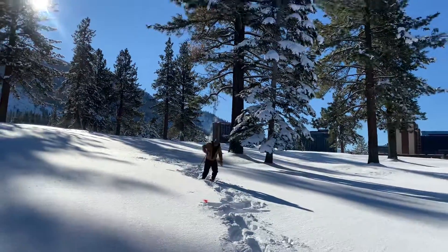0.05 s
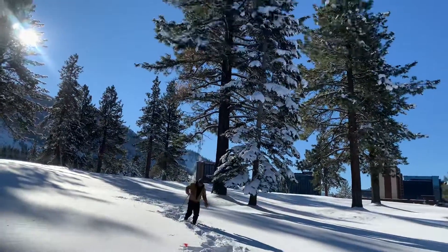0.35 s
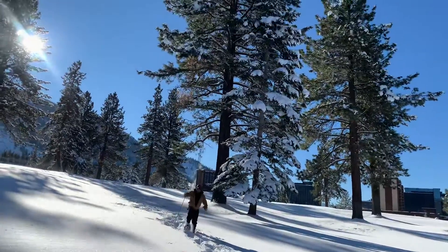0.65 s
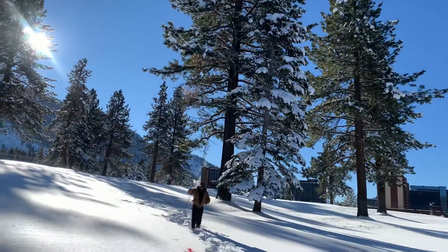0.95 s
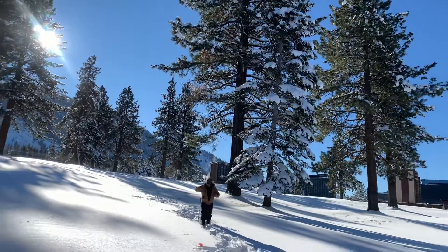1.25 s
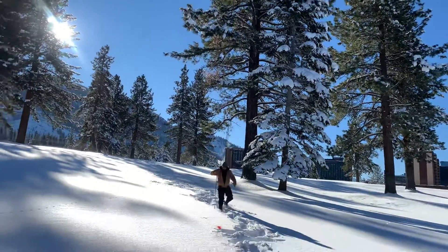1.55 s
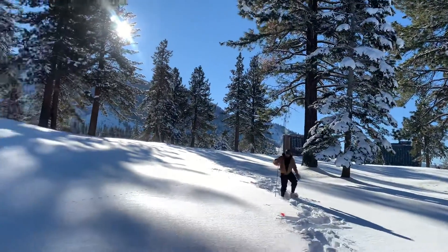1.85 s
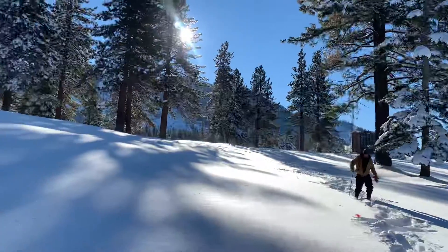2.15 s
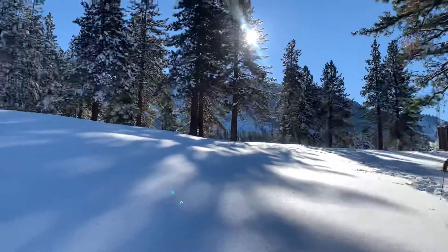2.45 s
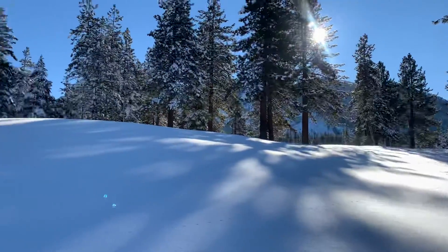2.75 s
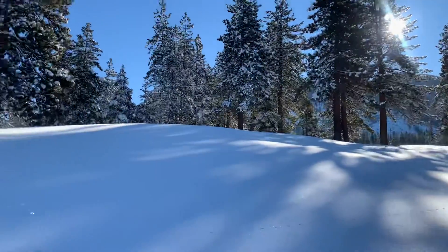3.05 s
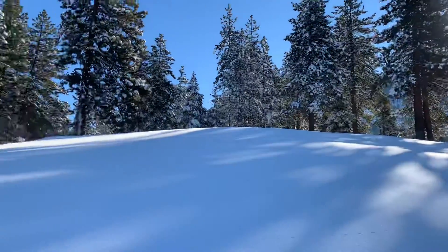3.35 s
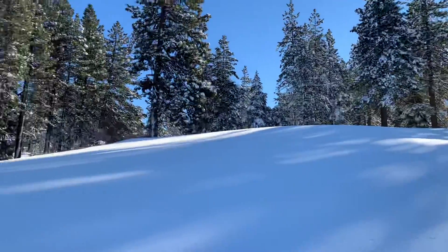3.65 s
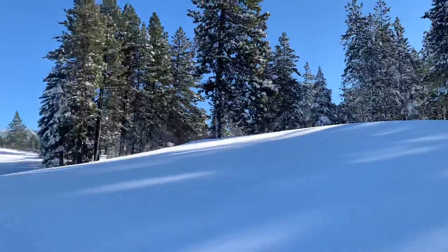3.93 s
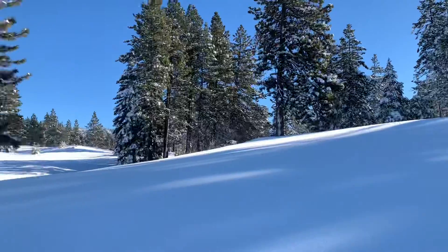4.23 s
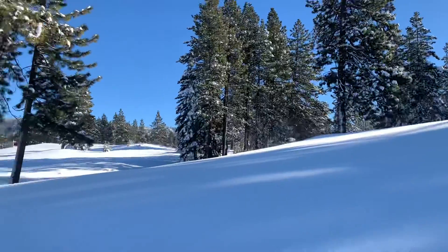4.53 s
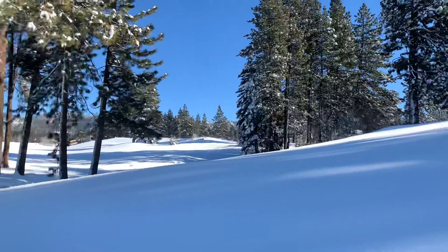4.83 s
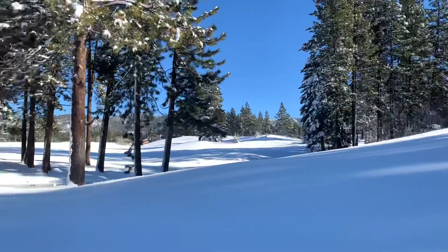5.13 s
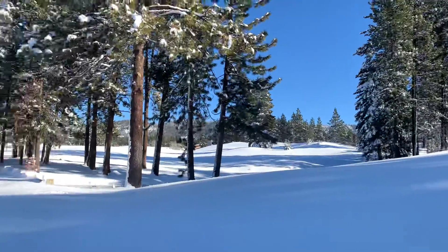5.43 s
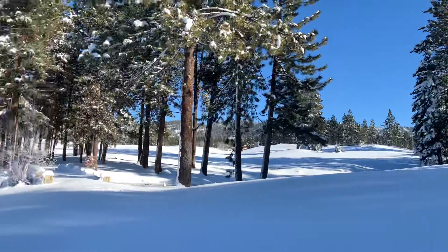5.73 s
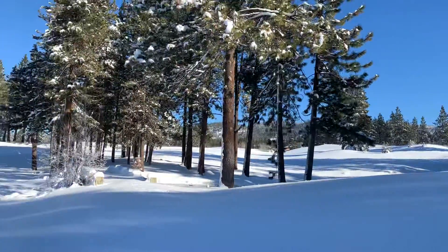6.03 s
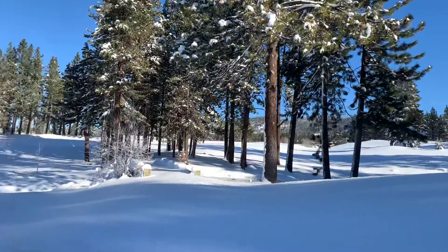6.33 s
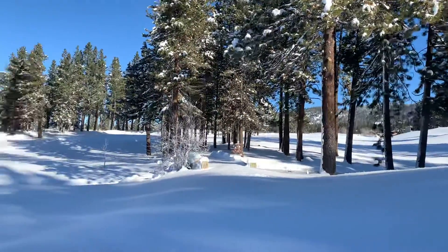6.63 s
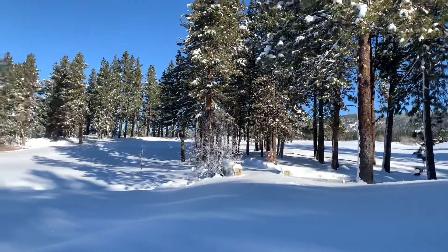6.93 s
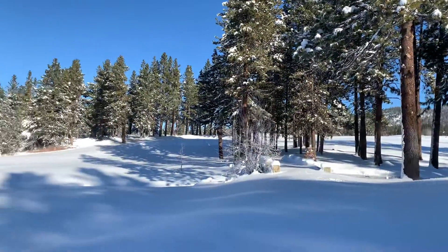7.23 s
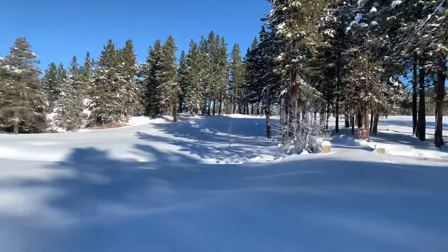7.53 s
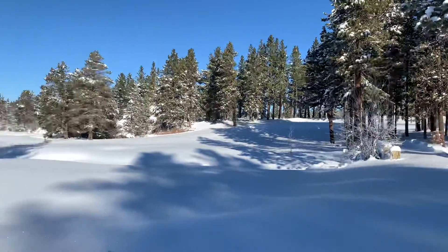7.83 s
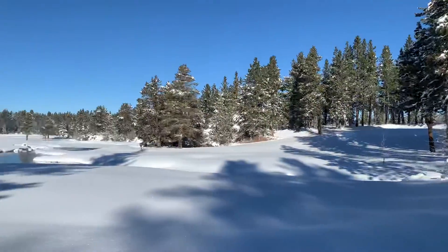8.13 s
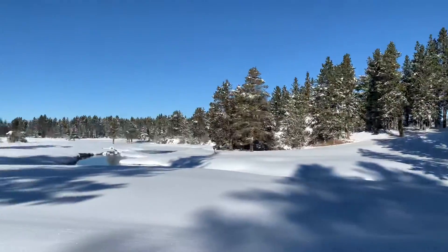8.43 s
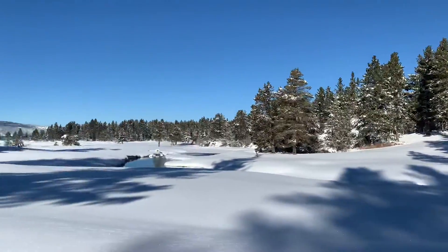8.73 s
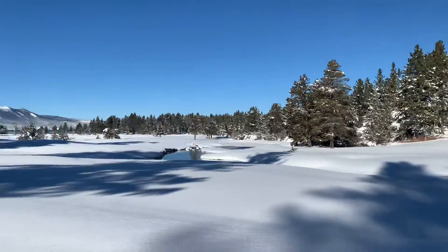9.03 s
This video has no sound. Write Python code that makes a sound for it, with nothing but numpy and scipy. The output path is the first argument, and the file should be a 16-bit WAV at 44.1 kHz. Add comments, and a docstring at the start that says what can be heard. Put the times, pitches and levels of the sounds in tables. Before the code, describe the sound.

Low, uneven gusts buffet the microphone over faint wind in distant pines, while a jacket rustles with small clicks.

```python
"""A snowfield with pines in a light wind, heard from a phone held by someone turning slowly on the spot.
Right on the microphone, gusts boom and flutter, eddies thump, and a finger knocks the case once.
Far off, the air roars softly in the trees. Within arm's reach a winter jacket swishes as cloth slides
over cloth, ticks as folds snap over, and gives one tiny squeak. A faint hiss lies under it all."""
import sys
import numpy as np
from scipy import signal
from scipy.fft import rfft, irfft, next_fast_len
from scipy.io import wavfile
from scipy.ndimage import uniform_filter1d, map_coordinates

SR = 44100
rng = np.random.default_rng(int(sys.argv[2]) if len(sys.argv) > 2 else 0)


def log_audio(samples):
    """Write samples as a 16-bit WAV file to the path given in sys.argv[1]."""
    # one column per channel
    frames = np.atleast_2d(samples).T
    # limit to full scale, then quantise
    limited = np.clip(frames, -1, 1)
    pcm = np.round(limited * 32767).astype(np.int16)
    wavfile.write(sys.argv[1], SR, pcm)


N = 404838
T = np.arange(N) / SR

# colour of lightly brushed cloth, close up: f/Hz, level/dB
LIGHT_CLOTH = [(1200, -19.5), (2200, -11), (2900, 1), (3800, 1), (4650, -6), (5300, -13), (6100, -14),
               (6800, -37.5), (10000, -50.5)]


def undb(db):
    """Decibels to gain."""
    return np.exp(np.asarray(db) * (np.log(10) / 20))


def unit(x):
    """Scale to rms 1."""
    return x / np.sqrt(np.mean(x ** 2))


def curves(table, at=T):
    """The columns of a table, joined by straight lines in time."""
    s, *columns = np.transpose(table)
    return [np.interp(at, s, c) for c in columns]


def colour(x, points):
    """Filter by an outline (f/Hz, level/dB) on a log-frequency axis."""
    hz, db = np.transpose(points)
    size = next_fast_len(N, True)
    bins_hz = np.maximum(np.fft.rfftfreq(size, 1 / SR), 1)
    gain = undb(np.interp(np.log(bins_hz), np.log(hz), db))
    return irfft(rfft(x, size) * gain, size)[:N]


def noise(points):
    """Coloured noise of rms 1 that dies away beyond the ends of its outline."""
    below = (points[0][0] / 2, points[0][1] - 20)
    above = (points[-1][0] * 2, points[-1][1] - 40)
    return unit(colour(rng.standard_normal(N), [below, *points, above]))


def walk(rate_hz):
    """A smooth random wander of rms 1."""
    step = int(SR / rate_hz)
    held = np.repeat(rng.standard_normal(N // step + 1), step)
    return unit(uniform_filter1d(held, step)[:N])


def steady(x, span_s):
    """Even out swells slower than span_s and scale to rms 1."""
    power = uniform_filter1d(np.abs(signal.hilbert(x)) ** 2, int(span_s * SR))
    return unit(x / np.sqrt(power + 1e-12))


def bell(s, length_s):
    """A smooth rise and fall around time s, 1 at the crest."""
    return np.exp(-(2 * (T - s) / length_s) ** 2)


def stereo(mid, side):
    """Left and right from mid and side."""
    return np.array([mid + side, mid - side])


def pan(x, db):
    """Place a sound by its left minus right level."""
    return x * undb(np.array([[1], [-1]]) * db / 2)


def ports(x, lead_rad):
    """A near source reaches the microphone's left port earlier by this phase."""
    return stereo(x, -np.tan(lead_rad / 2) * signal.hilbert(x).imag)


def add(out, s, sound):
    """Mix a sound in at time s."""
    start = int(s * SR)
    part = sound[..., :N - start]
    out[..., start:start + part.shape[-1]] += part


def wind_levels(breeze_boom_db=-39, breeze_flutter_db=-51.5, boom_wander_db=3.2, flutter_wander_db=2.6):
    """Boom, flutter and bare gust in dB: gusts add their power to the breeze, lulls take it away."""
    # gusts and puffs at the microphone: crest t/s, length/s, boom/dB, flutter/dB
    gusts = [(0.111, .05, -35, -48), (0.253, 0.08, -29.5, -39), (0.367, 0.098, -25.5, -41.5),
             (0.533, 0.11, -24.5, -39.5), (0.637, .11, -25.5, -40.5), (0.785, 0.18, -26.5, -45.5),
             (0.969, .06, -34.5, -42), (1.287, .12, -35.5, -45), (1.397, 0.088, -39, -42),
             (1.536, 0.15, -25, -37), (1.661, 0.053, -36.5, -55), (1.802, 0.09, -39, -39),
             (2.151, .17, -38, -54.5), (2.334, 0.14, -30.5, -40), (2.479, .06, -36, -47),
             (2.64, 0.045, -31.5, -49), (2.901, .14, -37, -56), (3.227, 0.065, -31, -44),
             (3.335, 0.064, -33, -48), (3.481, 0.16, -29.5, -47.5), (3.728, .11, -35, -58),
             (4.005, .08, -31.5, -50), (4.576, 0.15, -32.5, -47), (4.747, .07, -34, -59),
             (4.934, 0.094, -34.5, -41), (5.14, 0.092, -33, -57), (5.249, .08, -36.5, -61.5),
             (5.384, 0.099, -34.5, -56), (5.54, 0.047, -33, -40), (5.685, 0.055, -34, -58),
             (5.858, 0.082, -32.5, -56), (5.979, 0.1, -34.5, -53), (6.13, 0.1, -29.5, -47),
             (6.379, .08, -31.5, -34), (6.478, 0.23, -23.5, -39.5), (6.718, .15, -33.5, -48.5),
             (6.971, .1, -32.5, -41), (7.092, 0.2, -30, -38.5), (7.29, 0.2, -27, -38.5),
             (7.395, .08, -33, -39.5), (7.565, 0.15, -23, -40), (7.676, 0.16, -22, -35),
             (7.991, 0.11, -30.5, -40), (8.14, .1, -31, -37), (8.281, 0.15, -29, -39),
             (8.503, 0.074, -33, -52), (8.958, .1, -32, -44), (9.107, 0.17, -25.5, -37)]
    # moments when the wind drops away: t/s, length/s, level change/dB
    lulls = [(1.018, 0.028, -11), (2.006, 0.087, -10), (2.731, 0.15, -6), (3.14, 0.05, -8),
             (3.818, 0.04, -11.5), (4.271, 0.12, -11), (5.03, 0.29, -5.5), (6.267, 0.066, -9.5),
             (6.84, 0.06, -3), (8.41, 0.032, 1), (8.604, 0.041, -8), (8.816, 0.07, -4)]
    boom_power, flutter_power = undb(breeze_boom_db) ** 2, undb(breeze_flutter_db) ** 2
    for s, length_s, boom_db, flutter_db in gusts:
        swell = bell(s, length_s)
        boom_power += (undb(boom_db) * swell) ** 2
        flutter_power += (undb(flutter_db) * swell) ** 2
    gust_db = 10 * np.log10(boom_power)
    lull_db = sum(db * bell(s, length_s) for s, length_s, db in lulls)
    # the weak breeze is fitful, a strong gust blows more evenly
    waver = walk(16) * np.sqrt(undb(breeze_boom_db - gust_db))
    boom_db = gust_db + lull_db + boom_wander_db * waver
    flutter_db = 10 * np.log10(flutter_power) + lull_db / 2 + flutter_wander_db * waver
    return boom_db, flutter_db, gust_db


def wind_boom(level_db, gust_db, sag_per_db=0.0173):
    """Turbulence on the microphone drives a narrow boom whose pitch sags as the gust grows."""
    # resonances of the boom: f/Hz, width/Hz, level/dB
    modes = [(35.82, 3.5, -16.5), (50.98, 3.57, -5)]
    # the microphone sheds the deepest bass: f/Hz, gain/dB
    low_cut = [(22, -16), (34, -3), (46, 0)]
    push = noise([(26, -32), (36, -5.5), (47, -0.5), (56, -0.5), (70, -10.5), (130, -28)])
    boom = sum(undb(db) * signal.lfilter(*signal.iirpeak(hz, hz / width_hz, SR), push)
               for hz, width_hz, db in modes)
    speed = 1 - sag_per_db * (gust_db - gust_db.mean())
    boom = map_coordinates(boom, [np.cumsum(speed)], order=1, mode="mirror")
    boom = steady(boom, span_s=0.075) * undb(level_db)
    return pan(colour(boom, low_cut), db=-1.24)


def wind_flutter(level_db, side_db=-8):
    """Small eddies hit each port separately: a loose flutter, a little stronger on the right."""
    # colour of the flutter: f/Hz, level/dB
    spectrum = [(45, -30.5), (65, -6.5), (80, 3), (100, -1.5), (130, -11), (170, -19.5), (300, -43),
                (700, -61.5)]
    mid = steady(noise(spectrum), span_s=0.09)
    side = undb(side_db) * noise(spectrum)
    return pan(stereo(mid, side) * undb(level_db), db=-1.5)


def ground_ripple(x, reach_hz=2300, main_db=6, main_width_hz=90, patchy_db=2.5):
    """Far sound interferes with its ground echo: evenly spaced crests, shimmering in the moving air."""
    # the crests as the phone turns: t/s, strongest crest f/Hz, spacing/Hz, depth/dB
    comb = [(0, 1300, 802, 1), (1.6, 1230, 736, 1), (2.2, 1544, 524, .5), (3.3, 1347, 565, 1),
            (4.3, 1366, 645, 2), (5.1, 1420, 677, 1.5), (5.85, 1583, 543, 0.7), (6.6, 1630, 581, -0.3),
            (7.85, 1650, 654, 0.36), (9.18, 1636, 677, 1.5)]
    hz, s, frames = signal.stft(x, SR, nperseg=1024)
    crest_hz, spacing_hz, depth_db = curves(comb, s)
    hz = hz[:, None]
    crests = np.cos(2 * np.pi * (hz - crest_hz) / spacing_hz) / (1 + (hz / reach_hz) ** 8)
    main_crest = np.exp(-((hz - crest_hz) / main_width_hz) ** 2) * depth_db / depth_db.max()
    shimmer = uniform_filter1d(rng.standard_normal(frames.shape), size=3, axis=0)
    shimmer = unit(uniform_filter1d(shimmer, size=7, axis=1))
    lift_db = depth_db * crests + main_db * main_crest + patchy_db * shimmer
    return signal.istft(frames * undb(lift_db), SR)[1][:N]


def distant_air(direct=.9, wander_db=.6):
    """Far wind in the pines; it comes mostly from one side, so the ports hear it out of step."""
    # strength of the far wind: t/s, low roar/dB, body/dB, sough of the pines/dB
    levels = [(0.0, -58, -66.5, -66.5), (0.89, -58, -68.5, -69), (2.25, -58.5, -67, -67.5),
              (2.71, -59, -71, -67.5), (4.01, -59, -65, -68.5), (4.78, -57.5, -64.5, -64.5),
              (5.11, -61, -62.5, -66), (6.72, -60, -65, -63), (7.13, -56, -70.5, -62),
              (7.87, -59, -68, -61), (8.16, -58.5, -67, -65.5), (8.54, -56.5, -68.5, -68.5),
              (9.18, -60, -74, -66)]
    # colours of those three layers: f/Hz, level/dB
    roar = [(60, -1.5), (150, -2), (250, 3), (450, 1.5), (560, -1.5), (750, -17.5), (1200, -42)]
    body = [(350, -15.5), (600, 2.5), (820, 3.5), (1050, -1.5), (1300, -13), (2000, -29)]
    sough = [(800, -16), (1150, -0.5), (1450, -1), (1850, -4.5), (2200, -14), (2550, -21.5), (3000, -20),
             (4500, -33.5), (7000, -39.5)]
    # stereo width: f/Hz, side minus mid/dB
    width = [(100, -6.5), (250, -3.5), (420, -0.5), (670, 4.5), (1100, 2.5), (1500, -1), (2000, -8),
             (3000, -1), (5000, 2)]
    # the roar leans to the left: f/Hz, left minus right/dB
    balance = [(130, -0.5), (260, 5.5), (420, 1.5), (800, 0)]
    gains = [undb(db + wander_db * walk(6)) for db in curves(levels)]
    layers = list(zip((roar, body, sough), gains))
    front = sum(noise(spectrum) * gain for spectrum, gain in layers)
    diffuse = sum(noise(spectrum) * gain for spectrum, gain in layers)
    # the difference between two close ports is a quarter cycle behind their sum
    behind = signal.hilbert(front).imag
    side = colour(direct * behind + np.sqrt(1 - direct ** 2) * diffuse, width)
    left, right = stereo(ground_ripple(front), side)
    return np.array([colour(left, [(hz, db / 2) for hz, db in balance]),
                     colour(right, [(hz, -db / 2) for hz, db in balance])])


def faint_hiss(gust_db, floor_db=-86, swell_db=-70.5, full_at_db=-27.5):
    """A steady hiss in each channel, and a second one that swells with the strongest gusts."""
    # colours of the two hisses: f/Hz, level/dB
    floor_colour = [(1500, -10.5), (2900, -8), (4500, -20), (6500, -3), (9000, -14), (15000, -5.5)]
    swell_colour = [(1500, -14), (3000, -1.5), (4500, -13.5), (7000, -10.5), (11000, -13), (15000, -18.5)]
    floor = np.array([noise(floor_colour), noise(floor_colour)])
    swell = np.array([noise(swell_colour), noise(swell_colour)])
    onset_db = 6 * np.minimum(gust_db - full_at_db, 0)
    return floor * undb(floor_db) + swell * undb(swell_db + onset_db)


def rub_levels(rise_share=0.54, range_db=20, roundness=1.4, rest_db=-100):
    """Gains of light rubbing, pressed rubbing and sheen: each stroke climbs to a peak and falls away."""
    # sleeve strokes: peak t/s, length/s, level/dB, pressed against light cloth/dB, sheen/dB
    strokes = [(0.173, 0.81, -89.5, 9.5, -0.5), (0.994, 0.96, -91.5, 4.5, -8.5),
               (1.883, 1.3, -83.5, 8.5, -11), (2.262, 0.22, -82.5, -3, -6), (2.5, .3, -90.5, 2, -6),
               (3.0, 1.5, -90.5, -3, -5), (4.557, 0.41, -64, -3.5, 0), (5.082, .5, -78.5, -15, 1),
               (5.576, 0.32, -70, -12.5, -3.5), (5.947, 1, -85, -5, -7), (6.259, 0.25, -68, -11, -15.5),
               (6.326, .1, -66, -15, -16), (6.47, 0.24, -76.5, 0, -6), (7.025, 0.41, -62, -2, 0),
               (7.105, 0.17, -50.5, -3.5, -3.5), (7.154, 0.17, -56.5, 1.5, -0.5),
               (7.292, .3, -68.5, 5.5, 8), (7.441, 0.25, -70.5, 4, 4), (7.62, 0.35, -72, 2.5, 4),
               (7.886, 0.34, -77, 5.5, -1.5), (8.144, 0.19, -74, 2.5, -4), (8.441, 1.2, -81, 5, -3),
               (8.767, 0.32, -69, 2, 1.5), (9.176, 0.74, -73.5, 4, -8)]
    light = pressed = sheen = undb(rest_db) ** 2  # the cloth never lies quite still
    for s, length_s, db, pressed_db, sheen_db in strokes:
        from_peak = np.maximum((s - T) / rise_share, (T - s) / (1 - rise_share)) / length_s
        power = undb(db - range_db * from_peak ** roundness) ** 2
        light = light + power
        pressed = pressed + power * undb(pressed_db) ** 2
        sheen = sheen + power * undb(sheen_db) ** 2
    return np.sqrt(light), np.sqrt(pressed), np.sqrt(sheen / light)


def jacket_swish(grain_db=1.8, catch_db=1.2, creases_per_s=30, scatter_db=-9, echo_s=.0061, echo_db=-8):
    """Cloth slides over cloth at arm's length: countless tiny slips, crinkles and a ground echo."""
    # colours of hard-pressed cloth and of rustle scattered off the body: f/Hz, level/dB
    pressed_cloth = [(700, -23), (1300, -6), (1800, 2.5), (2250, -2), (2750, 1), (3400, -10.5), (4500, -20)]
    scatter = [(2000, -11), (3000, -4.5), (4400, 1.5), (5600, 0.5), (6500, -11.5), (9000, -29.5)]
    # treble cut that takes the sheen off the rustle: f/Hz, gain/dB
    sheen_cut = [(4600, 0), (5400, -22.5)]
    # bearing of the rubbing cloth from the microphone: t/s, left port's lead/rad
    bearing = [(2, 0.58), (4.55, 1.07), (6.3, 1.04), (7.1, 0.32), (7.6, 1.3), (9.18, 0.97)]
    light, pressed, sheen = rub_levels()
    slips = unit(undb(grain_db * walk(900) + catch_db * walk(70)))
    swish = (noise(LIGHT_CLOTH) * light + noise(pressed_cloth) * pressed) * slips
    # creases give way at random, harder when the cloth moves fast
    creases = (rng.random(N) < creases_per_s / SR) * rng.random(N)
    crinkles = colour(creases, LIGHT_CLOTH) * undb(-6) * light ** 0.98
    scattered = stereo(0, noise(scatter) * light * slips * undb(scatter_db))
    cloth = ports(swish + crinkles, *curves(bearing)) + scattered
    matte = np.array([colour(x, sheen_cut) for x in cloth])
    cloth = matte + sheen * (cloth - matte)
    return cloth + undb(echo_db) * np.roll(cloth, int(echo_s * SR), axis=1)


def case_knock(at_s=.158, rise_cycles=2.16, left_lag_rad=2.54):
    """A finger knocks the phone's case; each mode swells for about two cycles, so the lows come late."""
    # ringing of the case: f/Hz, level/dB, t60/s
    modes = [(246, -36, .035), (466, -19.5, 0.021), (810, -33, 0.012), (1250, -37, .01),
             (2130, -35.5, 0.011), (6600, -56, .0025)]
    out, t = np.zeros((2, N)), np.arange(SR // 10) / SR
    port_phase = np.array([[-1], [1]]) * left_lag_rad / 2
    for hz, db, t60 in modes:
        peak_s = rise_cycles / hz
        rise = np.minimum(t / peak_s, 1) ** 3
        fade = undb(-60 * np.maximum(t - peak_s, 0) / t60)
        add(out, at_s, undb(db) * rise * fade * np.sin(2 * np.pi * hz * t + port_phase))
    return out


def eddy_thumps(sweep_cycles=1.26, rest_hz=22.5, attack=.59, release=.66, pan_db=-11, settle_s=.014):
    """Each eddy is a quick downward sweep: the highs strike the right port, the bass trails on both."""
    # eddies on the microphone: t/s, peak/dB, starting pitch above rest/Hz, time to the peak/s
    eddies = [(0.164, -19, 214, 0.014), (0.873, -28, 330, 0.015), (1.141, -29.5, 202, 0.015),
              (1.459, -11.5, 280.7, 0.02), (2.045, -29, 194, 0.017), (2.987, -26.5, 275, 0.026),
              (3.857, -30.5, 178, 0.018), (3.981, -33.5, 169, 0.017), (4.407, -31, 212, 0.017),
              (4.848, -37, 300.4, 0.0081), (5.517, -36.5, 454, 0.0055), (5.905, -26.5, 238, 0.015),
              (6.065, -28, 210, 0.014), (7.23, -16.5, 270, 0.02), (7.553, -33.5, 328, 0.015),
              (9.061, -22, 247, 0.025)]
    out, t = np.zeros((2, N)), np.arange(SR // 8) / SR
    for s, db, hz, peak_s in eddies:
        cycles = sweep_cycles * np.log1p(t * hz / sweep_cycles) + rest_hz * t
        spread = np.where(t < peak_s, attack, release)
        swell = np.exp(-((t / peak_s - 1) / spread) ** 2)
        thump = undb(db) * np.sin(2 * np.pi * cycles) * swell
        add(out, s, pan(thump, pan_db * np.exp(-t / settle_s)))
    return out


def fold_ticks(rise_s=0.0024, top_hz=5000):
    """A fold snaps over near the microphone: a pitched tap inside a dry scrape, both dying quickly."""
    # snapping folds: t/s, level/dB, f/Hz, time to fall 20 dB/s, scrape against tap/dB
    folds = [(1.924, -59, 2870, 0.0034, -3), (2.448, -60, 2887, .004, 1), (2.66, -67.5, 3500, .004, 1),
             (3.173, -68, 2910, .005, 8), (3.347, -61.5, 2800, .003, 4), (3.351, -62, 3920, 0.005, 11),
             (4.1975, -56, 3570, 0.0026, 2), (4.3375, -58.5, 3900, 0.0036, -9),
             (4.396, -49.5, 2230, 0.0029, -9), (4.927, -52, 2800, 0.0074, -9.5),
             (6.233, -58, 3200, 0.0036, 7), (6.788, -62, 3730, 0.024, -6), (7.216, -59, 4240, .003, 5),
             (7.248, -47.5, 2031, 0.0056, 3), (7.345, -53, 3000, .003, 5), (7.373, -54.5, 2480, .006, -7),
             (7.611, -59.5, 2950, .004, -1), (8.267, -60, 2480, .005, -5), (8.426, -59.5, 3560, .005, 0),
             (8.458, -60, 3460, .004, 0), (8.486, -50.5, 1480, 0.022, -6), (8.497, -54, 1723, 0.023, -8),
             (8.8285, -54, 2890, .004, -3), (8.836, -52, 2980, .007, 0), (8.915, -57, 3220, 0.0026, -5),
             (9.083, -51, 1860, .005, 0), (9.083, -53, 3130, .007, -4), (9.124, -49, 3700, 0.0036, -1)]
    out, t = np.zeros(N), np.arange(SR // 20) / SR
    rise = np.sin(np.pi / 2 * np.minimum(t / rise_s, 1)) ** 2
    for s, db, hz, fall_s, scrape_db in folds:
        band = signal.butter(5, [hz / 1.8, min(hz * 1.45, top_hz)], "band", fs=SR, output="sos")
        scrape = unit(signal.sosfilt(band, rng.standard_normal(len(t))))
        tick = unit(np.sin(2 * np.pi * hz * t) + undb(scrape_db) * scrape) / np.sqrt(2)
        fade = undb(-20 * np.maximum(t - rise_s, 0) / fall_s)
        add(out, s, undb(db) * tick * rise * fade)
    return ports(out, lead_rad=1.0)


def fold_squeak(at_s=7.5425, length_s=0.0076, glide_share=0.1, rasp_db=-54):
    """A taut fold sticks and slips: a few rising partials over a little rasp."""
    # partials at the middle of the squeak: f/Hz, level/dB
    partials = [(2270, -43), (3520, -49), (4300, -51.5), (5150, -70)]
    out, t = np.zeros(N), np.arange(SR // 20) / SR
    progress = np.minimum(t / length_s, 1)
    clock = t * (1 + glide_share * (progress - 1) / 2)
    tone = sum(undb(db) * np.sin(2 * np.pi * hz * clock) for hz, db in partials)
    rasp = undb(rasp_db) * noise(LIGHT_CLOTH)[:len(t)]
    add(out, at_s, (tone + rasp) * np.sin(np.pi * progress))
    return ports(out, lead_rad=.7)


def scene():
    """Wind on the microphone and in the far pines, a faint hiss, a knock, and the jacket close by."""
    boom_db, flutter_db, gust_db = wind_levels()
    bed = wind_boom(boom_db, gust_db) + wind_flutter(flutter_db) + distant_air() + faint_hiss(gust_db)
    return bed + jacket_swish() + case_knock() + eddy_thumps() + fold_ticks() + fold_squeak()


def record(dry):
    """The phone cuts the top; the sound eases in and out over a few milliseconds."""
    top_hz, ease_s = 15700, .006
    from_edge_s = np.minimum(T, T[::-1])
    ease = np.sin(np.pi / 2 * np.minimum(from_edge_s / ease_s, 1)) ** 2
    high_cut = signal.ellip(8, .2, 70, top_hz, fs=SR, output="sos")
    return signal.sosfilt(high_cut, dry * ease)


dry = scene()
out = record(dry)
log_audio(out)
```